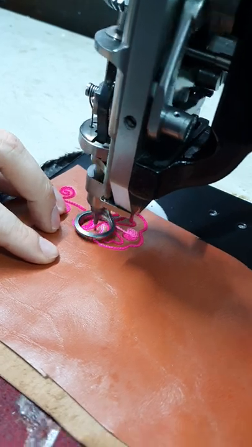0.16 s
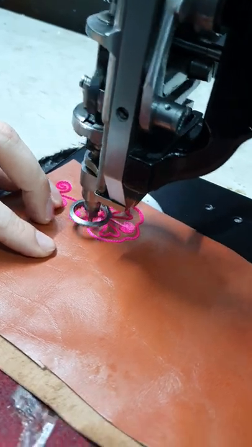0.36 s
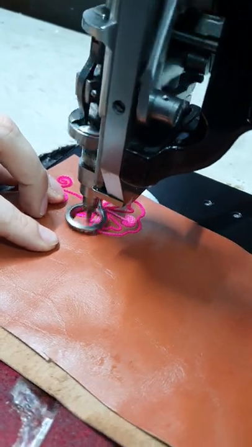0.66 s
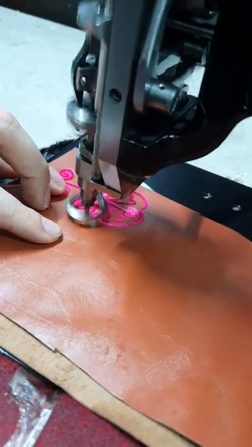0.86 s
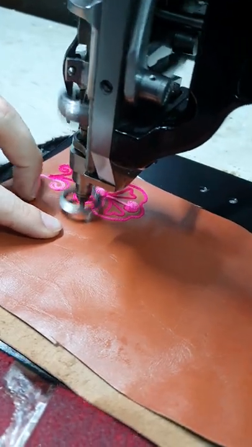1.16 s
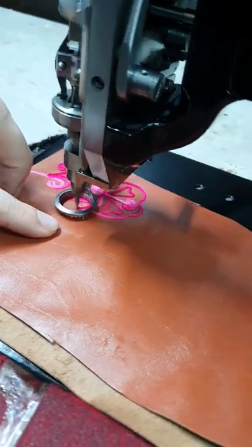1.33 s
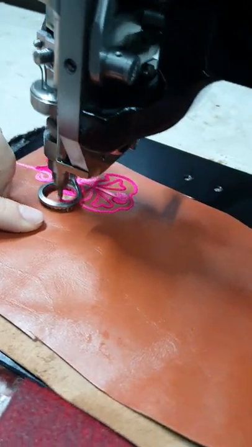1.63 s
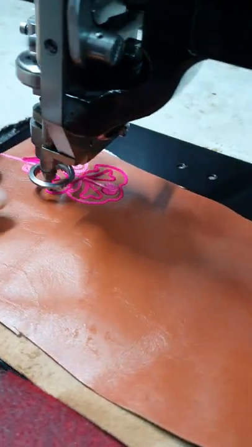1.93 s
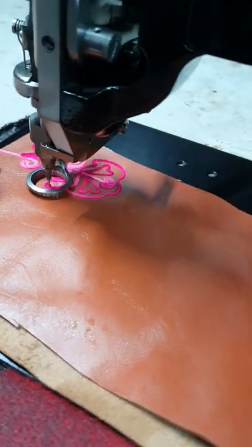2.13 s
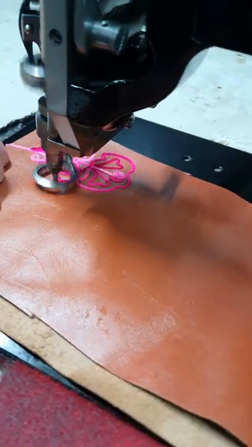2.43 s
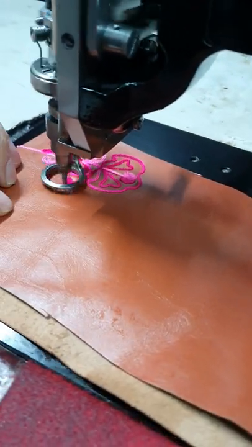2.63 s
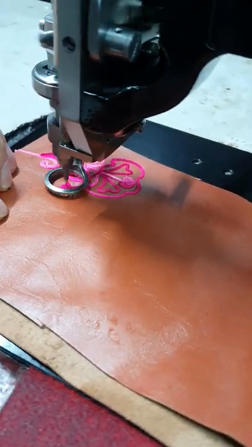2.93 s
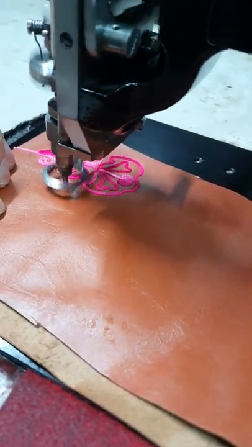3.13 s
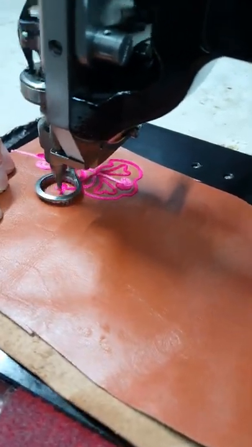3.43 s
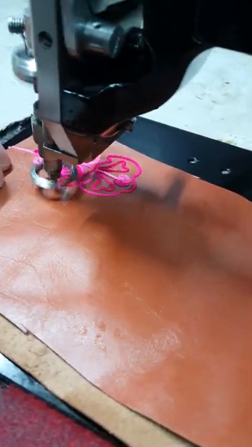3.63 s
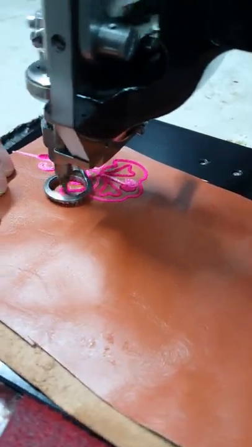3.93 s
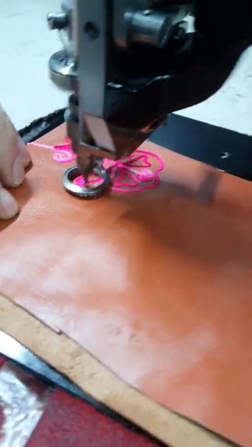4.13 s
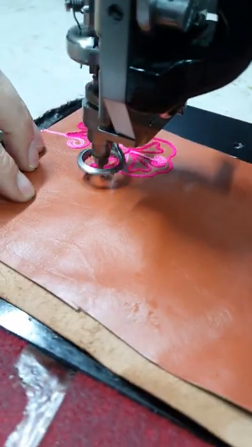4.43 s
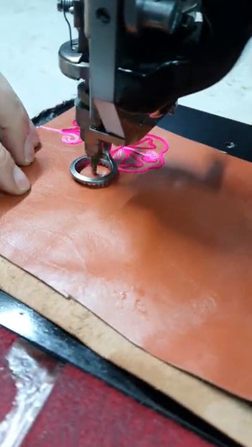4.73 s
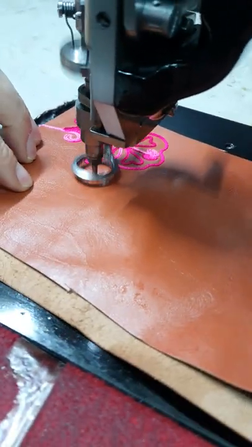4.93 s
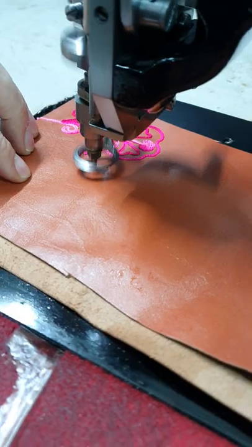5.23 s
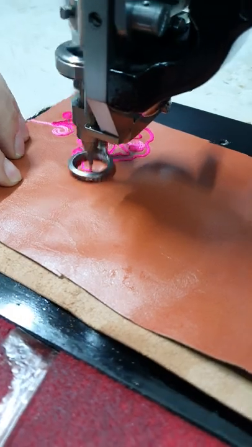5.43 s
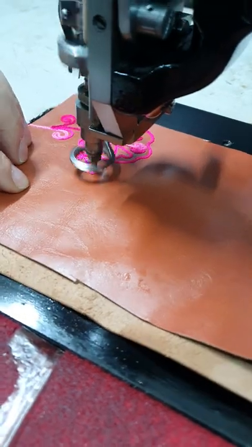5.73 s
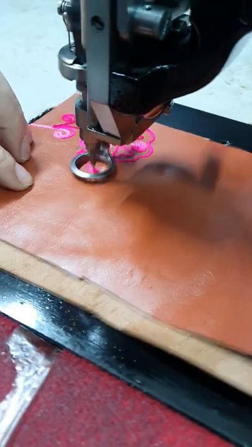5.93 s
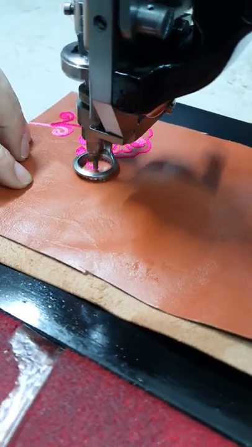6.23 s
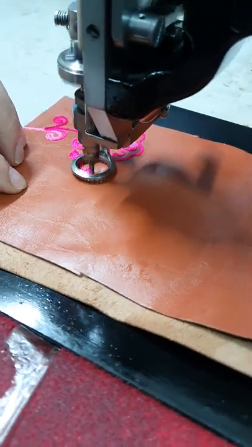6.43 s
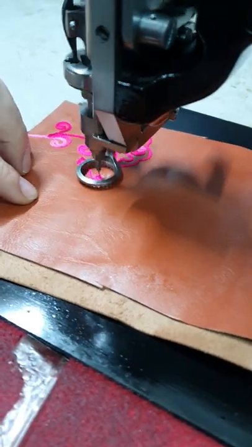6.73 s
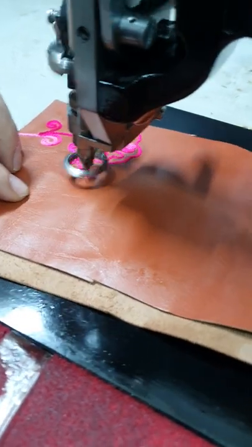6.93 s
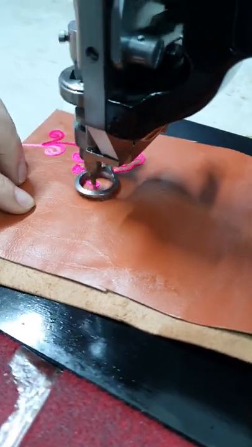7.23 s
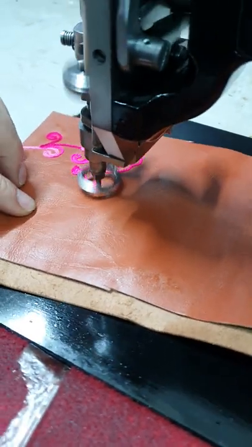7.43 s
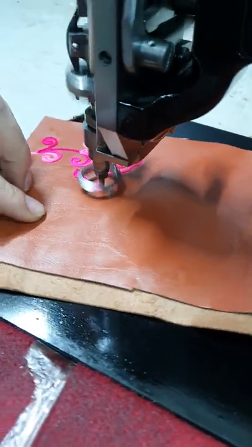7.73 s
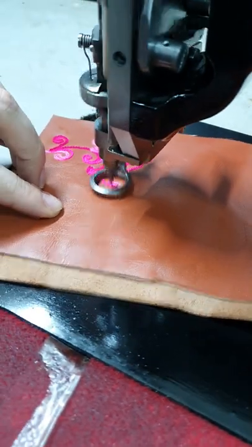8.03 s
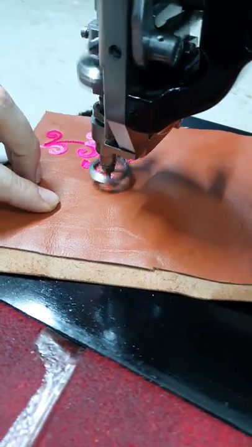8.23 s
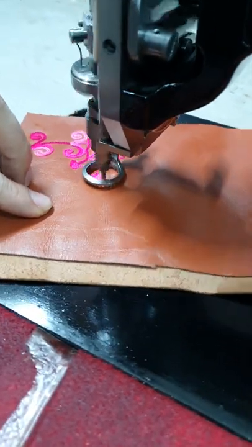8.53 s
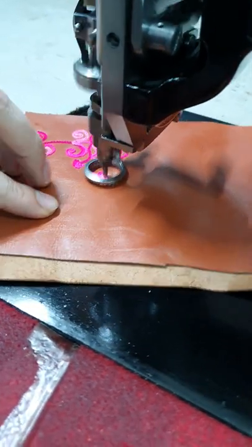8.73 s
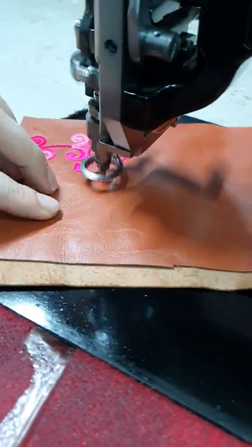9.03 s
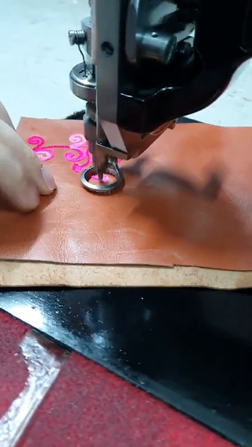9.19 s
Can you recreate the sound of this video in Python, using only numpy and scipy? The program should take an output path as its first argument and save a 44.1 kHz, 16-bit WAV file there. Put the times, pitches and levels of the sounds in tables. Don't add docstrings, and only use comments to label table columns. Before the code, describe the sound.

Close, steady clatter of a heavy stitching machine: rapid bright needle clacks, dull table thuds, clicking foot and whirring gears, slightly limping in rhythm.

```python
import sys
import numpy as np
from scipy import signal
from scipy.fft import rfft, irfft
from scipy.io import wavfile

SR = 44100
rng = np.random.default_rng(int(sys.argv[2]) if len(sys.argv) > 2 else 0)


def pcm_store(signal):
    levels = np.round(np.clip(np.atleast_2d(signal), -1, 1) * 32767)
    wavfile.write(sys.argv[1], SR, levels.astype(np.int16).T)


def natural_amplitude(level_db):
    exponent = np.asarray(level_db, float) / 20
    return 10 ** exponent


N = 412756
LEAD = 4096
M = N + LEAD

FIRST_S, TURN_S, TURNS = .01436, .131303, 72

# (frequency [Hz], level [dB], time to fade by 60 dB [s], first swing [+1 or -1])
TABLE_MODES = [(44.4, -27, 0.17, 1), (79.66, 4.5, 0.39, -1), (103.7, -1.5, 0.21, 1), (116.6, 1.5, 0.19, 1),
               (162.1, -10.5, 0.42, 1), (208.4, -16, 0.55, -1)]
FRAME_MODES = [(324.8, -1.5, 0.2, -1), (335.1, -4, 0.11, 1), (416.3, -11.5, 0.31, 1)]
BED_MODES = [(513, -2, 0.086, -1), (540.5, 2, 0.032, 1), (623.4, -16.5, 0.25, 1), (755, -15.5, 0.091, 1),
             (1024, -11.5, 0.029, -1), (1210, 2.5, 0.007, 1)]
STOP_MODES = [(5390, -3.5, 0.0047, -1), (6120, 9, 0.0033, 1), (6560, 6, 0.0063, -1),
              (7090, -7.5, 0.0093, 1), (9000, -3.5, 0.0033, 1), (10500, -11.5, 0.0056, 1),
              (13500, 1.5, 0.0026, -1)]
# (frequency [Hz], level [dB])
TICK_TONE = [(300, 10), (1000, -7), (2200, -3.5), (4300, 5), (7000, 7), (10000, 2.5), (13000, -1),
             (16000, -37)]
# (share of turn [0-1], level [dB])
GEAR_LOAD = [(0, 12), (.1, 4.5), (.17, 1.5), (.24, 5.5), (.3, -1.5), (.34, 7.5), (.5, 8), (.56, 6.5),
             (.63, -3), (.7, 6), (.75, 4.5), (.82, 2.5), (.9, 7.5), (1, 7.5)]
# (time [s], level [dB])
PHONE_AIM = [(0, -8.5), (.7, -4.5), (1.55, 1), (2.5, -1), (3.9, 3.5), (4.6, 0.6), (7.2, 1.05), (8, -0.5),
             (9.36, 1.3)]


def needle():
    # (frequency [Hz], level [dB])
    clack_tone = [(300, -7), (1000, 3.5), (2300, 2.5), (3500, 13.5), (5000, 12), (7000, 8), (10000, -1.5),
                  (16000, -3.5)]
    # (frequency [Hz], level [dB], time to fade by 60 dB [s], first swing [+1 or -1])
    plate_modes = [(503, -13.5, 0.028, 1), (606, -6.5, 0.028, 1), (758, -13.5, 0.058, 1),
                   (1145, -25, 0.083, -1), (1193, -16, 0.1, -1), (1694, 1, 0.0088, -1),
                   (2650, -34, 0.0063, 1), (3484, 5, 0.012, 1), (3775, -16.5, 0.15, -1),
                   (3950, -18, 0.14, 1)]
    arm_modes = [(78, 10.5, 0.19, 1), (139.8, -4.5, 0.59, -1), (170.4, -0.5, 0.26, -1),
                 (321.9, -3.5, 0.26, -1)]
    # (time [s], level [dB])
    plate_free = [(0, -15), (1.2, -12.5), (1.7, -18), (1.9, -9), (3, -11), (3.5, -10.5), (4.4, -9.5),
                  (5.3, -10), (6, -12.5), (6.3, -11.5), (6.95, -13.5), (7.24, -6), (7.5, -14.5),
                  (8.55, -12), (9.2, -16), (9.36, -10)]
    s = shaft(0)
    clack_db = strength(s, -1, PHONE_AIM, 0.53, 0.21)
    plate_db = strength(s, 0, plate_free, 0.81, 1.0)
    chance = rng.standard_normal((len(s), 2))
    first_bounce = s + .0017 + .0002 * chance[:, 0]
    second_bounce = s + .003 + .0003 * chance[:, 1]
    hits = np.r_[s, first_bounce, second_bounce, s - .005, s - .0025]
    hits_db = np.r_[clack_db, clack_db - 9, clack_db - 13, clack_db - 24, clack_db - 22]
    snap = crack(hits, hits_db - 17.5, clack_tone, rise_ms=0.17, t60=0.0044,
                 tail_db=-12, tail_t60=0.036, far_db=-14)
    stop = strike(hits + .0002, hits_db - 10.5, STOP_MODES, push_ms=.03)
    plate = strike(s + 0.00079, plate_db - 11.5, plate_modes, push_ms=0.13)
    arm = strike(s - .0012, -27 + 0 * s, arm_modes, push_ms=1.47)
    return snap + at_ports(stop, 0, -14) + at_ports(plate, 0, -2.5) + arm


def feed():
    # (time of the next needle stop [s], level change [dB])
    odd_drops = [(.01, 2), (1.07, 0), (2.64, 2.5), (3.03, -5.5), (3.17, -23), (4.61, 0.5), (5.27, 1),
                 (5.79, -0.5), (6.18, -10), (6.71, -8), (7.11, -9), (7.24, 2.5), (7.63, -2.5), (7.76, -3.5),
                 (7.89, -1.5), (8.15, -8), (8.29, 1.5), (8.81, -6), (8.94, -5), (9.07, -8), (9.21, 2)]
    s = shaft(.669 - 1)
    odd_s, odd_db = np.transpose(odd_drops)
    thud_db = -16 + 0.23 * rng.standard_normal(TURNS)
    odd_turns = np.round((odd_s - FIRST_S) / TURN_S).astype(int)
    thud_db[odd_turns] += odd_db
    drop = s + 0.00081 * rng.standard_normal(TURNS)
    thud = strike(drop, thud_db - .6, TABLE_MODES, push_ms=4.27)
    rebound = strike(drop + 0.012, thud_db - 0.5, TABLE_MODES[1:2], push_ms=8.9)
    return thud + rebound


def foot():
    # (time [s], level [dB])
    foot_force = [(0, -21.5), (1.25, -24.5), (1.77, -27), (1.9, -22.5), (2.43, -27), (2.7, -27.5),
                  (2.95, -23), (3.88, -26), (4, -20), (5.45, -24), (5.6, -32.5), (6.24, -24), (6.63, -36),
                  (7.16, -20), (7.55, -28), (8.1, -20), (8.7, -29), (9.3, -23.5)]
    # (frequency [Hz], level [dB], time to fade by 60 dB [s], first swing [+1 or -1])
    heel_modes = [(69.3, 6, 0.13, -1), (158, 0, 0.028, 1)]
    s = shaft(.412, count=TURNS - 1)
    click_db = strength(s, -18.5, PHONE_AIM, 1.05, 1.15)
    bed_db = strength(s, -26, PHONE_AIM, 0.33, 2.7)
    frame_db = strength(s, 0, foot_force, 0.9, 0.77)
    click = crack(s, click_db - 1, TICK_TONE, rise_ms=0.26, t60=0.011,
                  tail_db=-38, tail_t60=0.12, far_db=-45)
    stop = strike(s, click_db - 3.5, STOP_MODES, push_ms=.03)
    s = s + 0.00069 * rng.standard_normal(len(s))
    frame = strike(s + 0.0011, frame_db + 0.5, FRAME_MODES, push_ms=1.0)
    bed = strike(s + .0012, bed_db + 2.5, BED_MODES, push_ms=0.66)
    heel = strike(s - .0025, -21 + 0 * s, heel_modes, push_ms=2.3)
    return click + at_ports(stop, 0, -14) + at_ports(frame, 1.1, -1.1) + bed + heel


def looper():
    # (time [s], level [dB])
    tension = [(0, -6), (1.3, -2.5), (2.6, -4), (3.5, 1.5), (4, -2), (5.5, 4.5), (5.95, -5.5), (7.3, -1.5),
               (8.3, 0), (9.36, 0)]
    s = shaft(.326, count=TURNS - 1) + 0.00066 * rng.standard_normal(TURNS - 1)
    db = strength(s, -31.5, tension, 0.72, 1.7)
    chance = rng.random((len(s), 4))
    second = s + .0015 + .0015 * chance[:, 0]
    rebound = s + .0005 + .004 * chance[:, 1]
    hits = np.r_[s - .0012, second, rebound]
    hits_db = np.r_[db - 2, db + 2 - 6 * chance[:, 2], db - 4 - 6 * chance[:, 3]]
    ticks = crack(hits, hits_db + 12.0, TICK_TONE, rise_ms=0.099, t60=0.0056,
                  tail_db=-5, tail_t60=0.013, far_db=-44)
    return ticks + strike(hits, hits_db + 6.5, BED_MODES[3:], push_ms=0.3)


def latches():
    # (share of turn [0-1], level [dB], timing scatter [ms])
    latch_list = [(.63, -38, .8), (.69, -26, 1.5), (0.794, -28.5, 0.53), (.96, -26, .3), (.98, -37, 0.33)]
    # (frequency [Hz], level [dB])
    latch_tone = [(1000, -24), (4000, -6), (6500, 1), (9000, -1.5), (13000, -14), (16000, -8)]
    s = np.concatenate([shaft(share - 1) + ms / 1000 * rng.standard_normal(TURNS)
                        for share, _, ms in latch_list])
    db = np.repeat(np.transpose(latch_list)[1], TURNS) + strength(s, 0, PHONE_AIM, 0.92, 2.5)
    return crack(s, db, latch_tone, rise_ms=.1, t60=0.014, tail_db=-5, tail_t60=.02, far_db=-18)


def linkage():
    # (share of turn [0-1], frequency [Hz], level [dB], time to fade by 60 dB [s])
    levers = [(.335, 1700, -29, .04), (.35, 1270, -31, .04), (.44, 4400, -31, .03), (.52, 3100, -33, .04),
              (.69, 1850, -35, .03), (.797, 1070, -28, .03), (.8, 2000, -32, .015), (.87, 985, -30, .05),
              (.965, 2900, -31, .015), (.045, 1000, -28, .03)]
    # (time [s], level [dB])
    take_up_slack = [(0, -26), (2, -44), (5, -49), (6.2, -21), (6.9, -41), (7.6, -33), (9.36, -33)]
    # (time [s], level [dB])
    loose_play = [(0, -87), (2, -26), (4, -27), (5.6, -23.5), (6.3, -25), (6.9, -21.5), (7.4, -19.5),
                  (8.3, -24.5), (9.36, -28.5)]
    out = np.zeros((2, M))
    for share, hz, db, t60 in levers:
        s = shaft(share, count=TURNS - 1) + 0.0007 * rng.standard_normal(TURNS - 1)
        out += pings(s, hz, db, t60)
    s = shaft(.17, count=TURNS - 1) + 0.00052 * rng.standard_normal(TURNS - 1)
    for hz in (2000, 2600):
        out += pings(s, hz, np.interp(s, *np.transpose(take_up_slack)), 0.0093)
    for hz in (1630, 1940, 2300, 2590, 3180):
        loose_s = rng.random(220) * N / SR
        out += pings(loose_s, hz, np.interp(loose_s, *np.transpose(loose_play)), 0.0079)
    return out


def guide():
    # (time [s], level [dB])
    buzz = [(7.8, -60), (8.05, -45), (8.35, -25), (8.65, -22.5), (8.8, -42), (8.95, -60)]
    chance = rng.random((260, 2))
    s = buzz[0][0] + (buzz[-1][0] - buzz[0][0]) * chance[:, 0]
    load_db = np.interp((s - FIRST_S) / TURN_S % 1, *np.transpose(GEAR_LOAD))
    buzz_db = np.interp(s, *np.transpose(buzz)) + load_db - 5.5 - 6 * chance[:, 1]
    return pings(s, 2740, buzz_db, 0.013)


def gears():
    # (frequency [Hz], level [dB])
    teeth_tone = [(40, -4), (90, -8), (250, -4), (500, 7.5), (1100, 0.5), (1700, 3.5), (2200, 0.5),
                  (3000, 4), (5000, 1.5), (8000, -9), (16000, -9)]
    t = (np.arange(M) - LEAD) / SR
    turn = np.interp(t, shaft(-1, count=TURNS + 2), np.arange(TURNS + 2)) % 1
    load = natural_amplitude(np.interp(turn, *np.transpose(GEAR_LOAD)))
    chance = rng.random((2500, 2))
    tick_s = chance[:, 0] * M / SR - LEAD / SR
    tick_db = np.minimum(-3.5 * np.log(1 - chance[:, 1]), 11) - 3
    grain = burst(tick_s, tick_db, 0.31, 0.011)
    noise = rng.standard_normal((3, M))
    low_pass = signal.butter(1, 800, fs=SR, output="sos")
    hiss = noise[1:] + signal.sosfilt(low_pass, noise[0] - noise[1:])
    teeth = colour(load * (1 + 0.97 * grain) * hiss, teeth_tone) * natural_amplitude(-39.5)
    high_pass = signal.butter(2, 7500, "high", fs=SR, output="sos")
    specks = signal.sosfilt(high_pass, (load * grain) ** 2 * noise[1:]) * natural_amplitude(np.array([[-58], [-64]]))
    shake = load * rng.standard_normal(M)
    frame = sum(natural_amplitude(g) * ring(shake, hz, t60) for hz, g, t60, _ in FRAME_MODES + BED_MODES[:1])
    table = sum(natural_amplitude(g) * ring(shake, hz, t60) for hz, g, t60, _ in TABLE_MODES)
    return teeth + specks + frame * natural_amplitude(-72) + table * natural_amplitude(-67)


def shaft(share, count=TURNS):
    # (times per belt loop, delay [ms], share of loop where it is latest [0-1])
    belt = [(1, 1.83, .6325), (2, 1.29, .2537)]
    # (time [s], delay [ms])
    drag = [(0, 0), (.67, .3), (.93, 1.1), (1.7, .5), (2, -.3), (3.3, -.6), (4.2, 0), (5.1, -.7), (6, -.6),
            (7.25, .6), (7.75, .1), (8.05, 1), (8.4, .8), (8.8, -.9), (9.2, .6)]
    turn = np.arange(count) + share
    loops = .2333 * turn
    belt_ms = sum(ms * np.cos(2 * np.pi * k * (loops - top)) for k, ms, top in belt)
    s = FIRST_S + TURN_S * turn
    return s + (belt_ms + np.interp(s, *np.transpose(drag))) / 1000


def strength(s, db, curve, share, spread_db):
    return db + share * np.interp(s, *np.transpose(curve)) + spread_db * rng.standard_normal(len(s))


def at_ports(x, near_db, far_db):
    return x * natural_amplitude(np.array([[near_db], [far_db]]))


def train(s, db):
    x = np.zeros(M)
    place = np.clip((np.asarray(s) * SR).astype(int) + LEAD, 0, M - 1)
    np.add.at(x, place, natural_amplitude(db))
    return x


def ring(x, hz, t60):
    r = np.exp(-np.log(1000) / (t60 * SR))
    w = 2 * np.pi * hz / SR
    return signal.lfilter([0, r * np.sin(w)], [1, -2 * r * np.cos(w), r * r], x)


def strike(s, db, modes, push_ms):
    chance_db = 1.0 * rng.standard_normal((len(s), len(modes)))
    out = np.zeros(M)
    for k, (hz, mode_db, t60, sign) in enumerate(modes):
        out += np.sign(sign) * ring(train(s, db + mode_db + chance_db[:, k]), hz, t60)
    push = np.hanning(int(push_ms * SR / 1000) + 3)
    return np.convolve(out, push / push.sum())[:M]


def burst(s, db, rise_ms, t60):
    fall = np.exp(-np.log(1000) / (t60 * SR))
    rise = np.exp(-1000 / (rise_ms * SR))
    return signal.lfilter([1 - rise], np.convolve([1, -fall], [1, -rise]), train(s, db))


def crack(s, db, points, rise_ms, t60, tail_db, tail_t60, far_db):
    snap = burst(s, db, rise_ms, t60) * rng.standard_normal(M)
    far_snap = natural_amplitude(far_db) * np.roll(snap, 17)
    tail = burst(s, db + tail_db, 0.63, tail_t60) * rng.standard_normal((2, M))
    return colour(np.array([snap, far_snap]) + tail, points)


def pings(s, hz, db, t60):
    chance_db = 2 * rng.standard_normal((len(s), 2))
    near = ring(train(s, db + chance_db[:, 0]), hz, t60)
    far = ring(train(s + 0.0003, db - 9.5 + chance_db[:, 1]), 1.03 * hz, t60)
    return np.array([near, far])


def colour(x, points):
    hz, db = np.transpose(points)
    grid = np.maximum(np.arange(2049) * SR / 4096, 1)
    cepstrum = irfft(np.interp(np.log(grid), np.log(hz), db) * np.log(10) / 20)
    cepstrum[1:2048] *= 2
    cepstrum[2049:] = 0
    response = irfft(np.exp(rfft(cepstrum)))
    response = np.reshape(response, (1,) * (x.ndim - 1) + (-1,))
    return signal.oaconvolve(x, response, axes=-1)[..., :M]


def walls(dry):
    t = np.arange(int(.3 * SR)) / SR
    echo = rng.standard_normal((2, len(t))) * np.exp(-np.log(1000) * t / 0.13) * (t > .004)
    echo = signal.sosfilt(signal.butter(1, 250, "high", fs=SR, output="sos"), echo)
    return natural_amplitude(-33.5) * signal.fftconvolve(dry.mean(axis=0, keepdims=True), echo, axes=1)[:, :M]


def scene():
    # (frequency [Hz], level [dB])
    near_port = [(28, -22), (40, 3.5), (65, -1.9), (190, 1.6), (255, 6), (320, 2.5), (1000, 2), (4500, 0.5),
                 (5500, -1), (6300, 1.5), (7000, -1), (7700, -7.5), (12000, -6.5), (16000, -5)]
    far_port = [(28, -26.5), (40, -2), (65, -4), (190, 0.8), (255, 8), (320, 0.5), (1000, 2.5), (1700, -1),
                (3000, -2), (6300, -5), (7600, -6), (12000, -9.5), (16000, -21)]
    dry = needle() + feed() + foot() + looper() + latches() + linkage() + guide() + gears()
    air = dry + walls(dry)
    return np.array([colour(air[0], near_port), colour(air[1], far_port)])[:, LEAD:]


def roll_off(x):
    return signal.sosfilt(signal.butter(12, 16820, fs=SR, output="sos"), x)


def record(dry):
    x = np.tanh(0.82 * dry) / 0.76
    x = signal.sosfilt(signal.ellip(8, .2, 60, 15900, fs=SR, output="sos"), x)
    return roll_off(x)


dry = scene()
out = record(dry)
pcm_store(out)
```